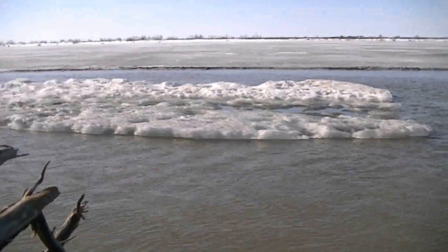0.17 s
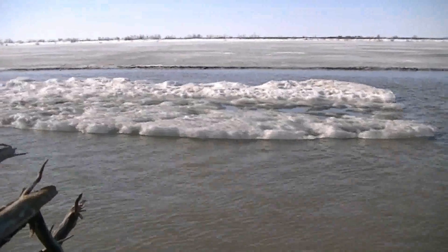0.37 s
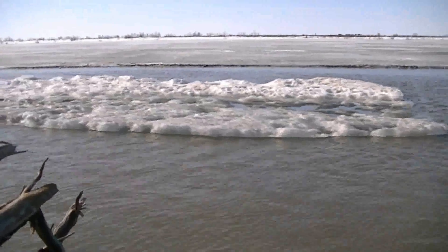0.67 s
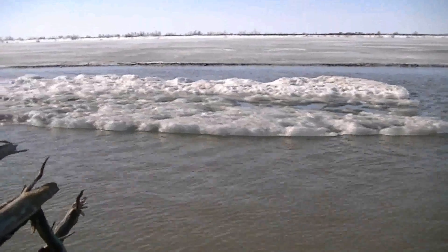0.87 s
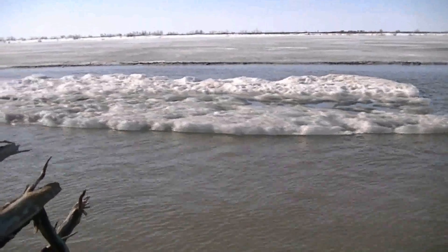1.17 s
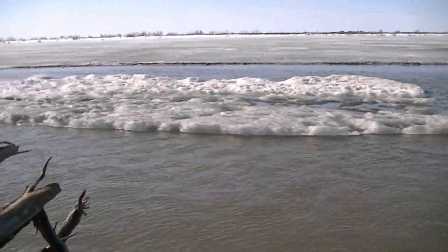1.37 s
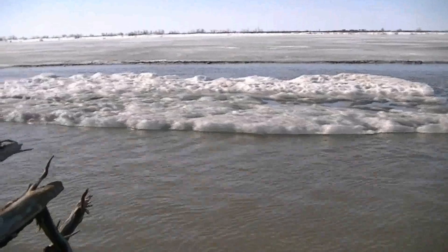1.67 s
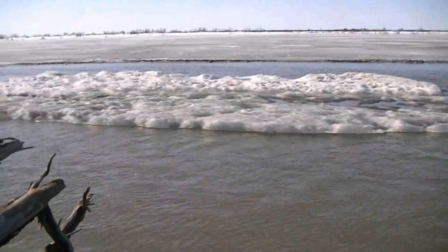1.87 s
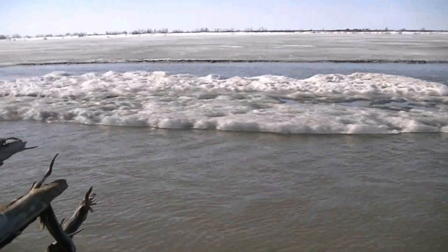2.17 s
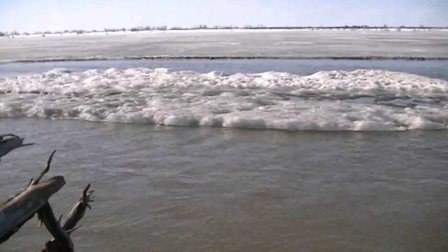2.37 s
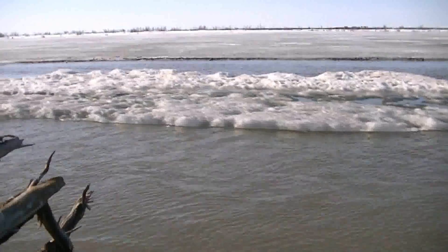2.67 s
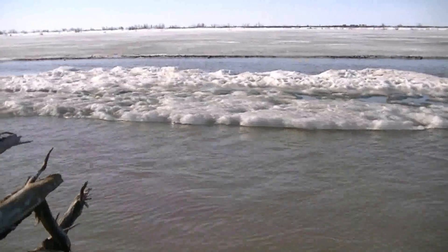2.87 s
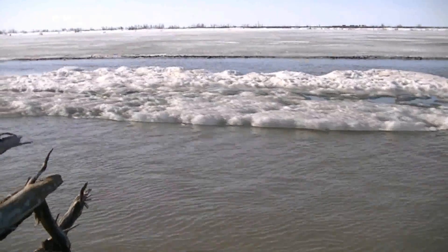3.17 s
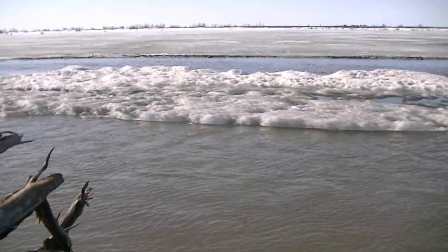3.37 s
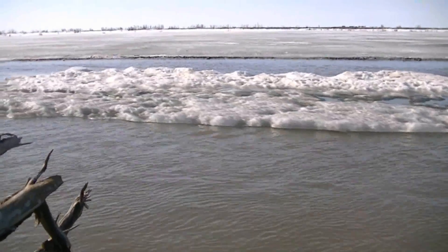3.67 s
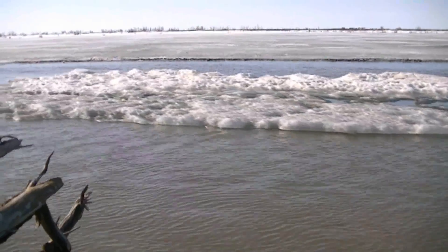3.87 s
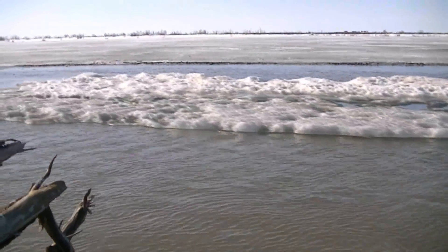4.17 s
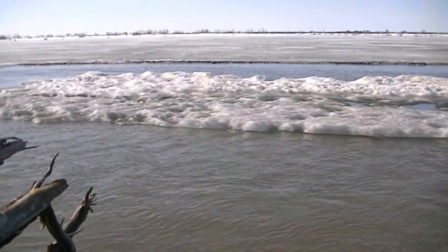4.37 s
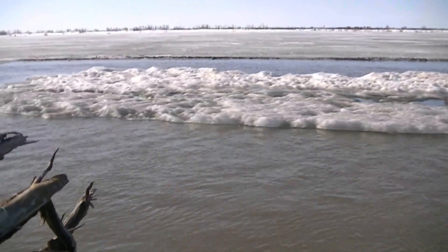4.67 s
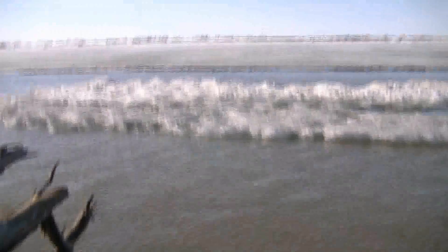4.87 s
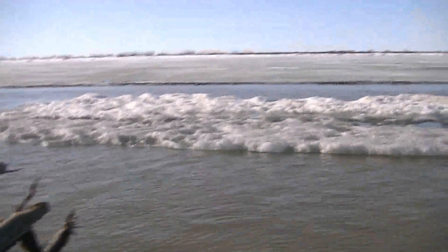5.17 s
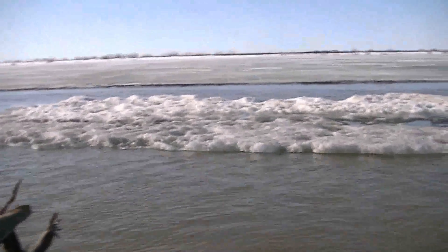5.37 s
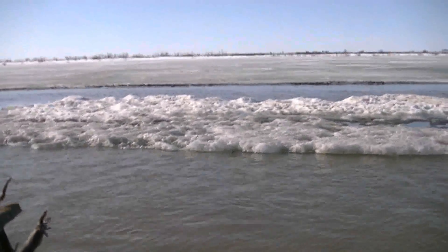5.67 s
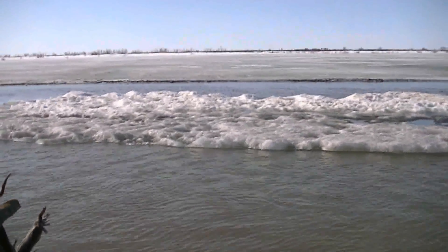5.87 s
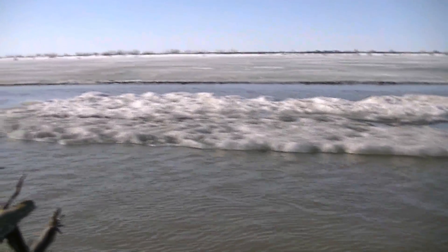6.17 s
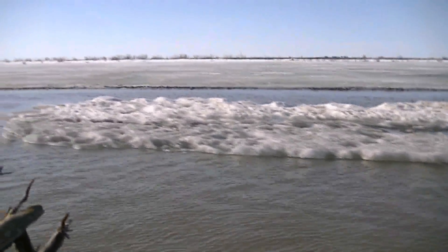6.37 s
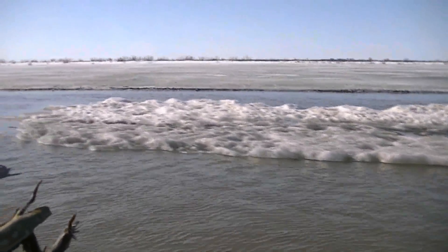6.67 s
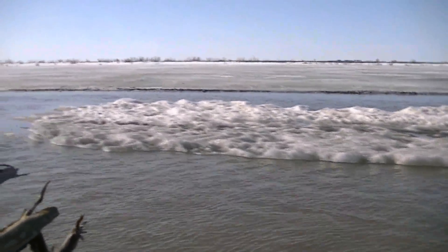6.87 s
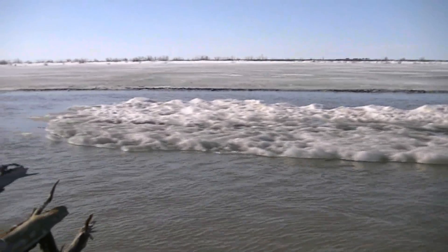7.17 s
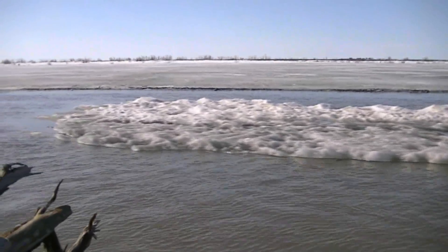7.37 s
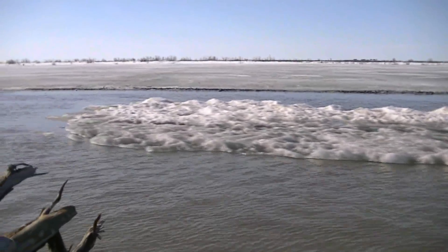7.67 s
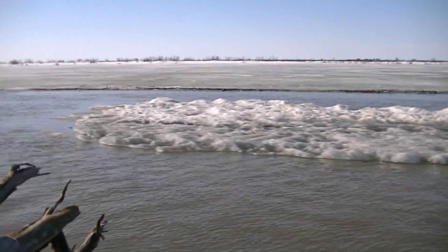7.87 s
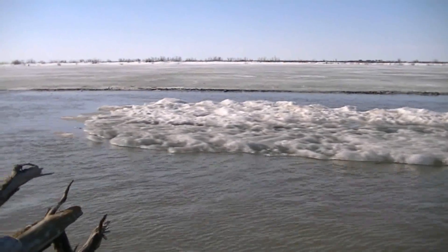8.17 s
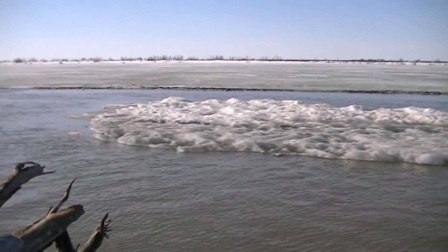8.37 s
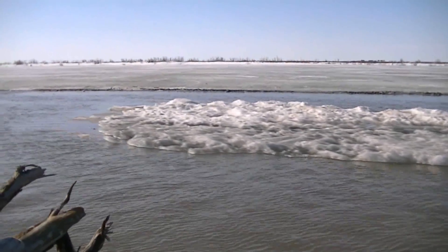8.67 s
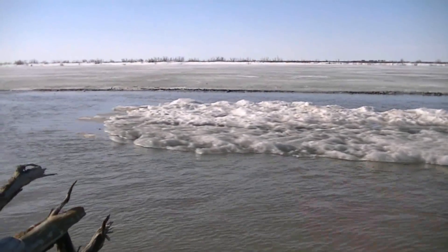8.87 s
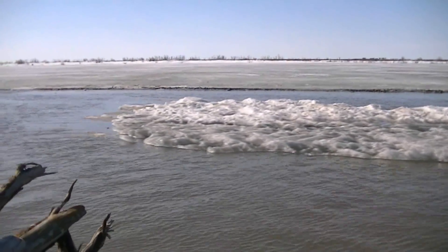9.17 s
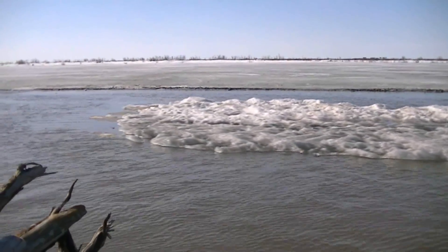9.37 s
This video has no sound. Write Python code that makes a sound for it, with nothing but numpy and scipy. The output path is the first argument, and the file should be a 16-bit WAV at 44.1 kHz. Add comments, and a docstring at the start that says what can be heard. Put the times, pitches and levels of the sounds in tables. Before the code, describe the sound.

Melting ice drifting on a river, heard close from the bank outdoors. Irregular dry cracks, needle-like ticks and short hollow pops come in clusters, densest between about two and six seconds, then thin out. Beneath them are tiny bubbling trickles, drips and a faint patchy hiss. Brief low wind flutters hit the stereo microphone, mostly on the right; a far bird honks faintly.

```python
"""Rotten, melting river ice, heard from the bank: cracks with short rings, dry needle snaps and drips.
Ripples under the ice drive a trickle of small pops, a needle crackle and a soft, patchy hiss.
Gusts flutter mostly on the right microphone port, as shaped noise and single eddy pulses.
A distant two-harmonic bird honk, faint sine peeps and a thin trill of narrow-band noise lie behind."""
import sys
import numpy as np
from scipy import signal
from scipy.fft import rfft, irfft
from scipy.io import wavfile
from scipy.ndimage import uniform_filter1d

SR = 44100
rng = np.random.default_rng(int(sys.argv[2]) if len(sys.argv) > 2 else 0)


def store_wav(level_fs):
    """Save 16-bit WAV to argv[1]."""
    pcm = np.round(np.clip(np.atleast_2d(level_fs), -1, 1) * 32767)
    wavfile.write(sys.argv[1], SR, pcm.T.astype(np.int16))


N = 420273

# ice breaks: (time [s], ring level [dB], pitch [Hz], 1/e decay [cycles], relative crack level [dB])
ICE_BREAKS = [(.0766, -44, 2020, 2.2, -45), (0.09, -37, 1690, 1.8, -40.5), (0.116, -33.5, 1790, 2.2, -37),
              (0.169, -41, 1510, 2.4, -44), (0.1767, -28, 1610, 0.86, -39), (.209, -28.5, 1930, 1.8, -36),
              (0.3437, -24, 4520, 1.2, -31), (0.466, -27, 1690, 6.7, -33), (0.637, -35.5, 1670, 3.6, -42),
              (0.768, -39.5, 1670, 6.2, -63), (0.831, -24.5, 4770, 0.61, -69),
              (1.0575, -38, 4850, 2.1, -35), (1.0825, -33.5, 1730, 3.6, -49),
              (1.391, -22.5, 1510, 1.2, -50), (1.3973, -40, 1280, 1.54, -40.5),
              (1.4951, -32, 1520, 0.34, -44), (1.727, -32, 1480, 0.46, -47),
              (1.853, -29, 1890, 1.15, -36.5), (1.971, -35.5, 1820, 5.7, -64),
              (1.9907, -30, 1630, 0.49, -39), (2.046, -38.5, 1700, 3.5, -47),
              (2.0577, -39.5, 650, 1.5, -42), (2.124, -35.5, 1420, 9.4, -62), (2.1377, -31, 1740, 1.9, -43),
              (2.169, -36, 3290, 1.9, -38), (2.2698, -38, 4600, 3.6, -47), (2.3155, -28, 610, 0.48, -40),
              (2.346, -33, 1740, .9, -37.5), (2.4041, -26, 5800, 0.62, -36.5),
              (2.4222, -35.5, 1770, 7.2, -36), (2.4348, -22, 1080, 0.48, -33),
              (2.4491, -29.5, 4800, 2.8, -32), (2.4756, -19.5, 816, 2.2, -44),
              (2.4869, -19.5, 1090, 0.46, -44), (2.525, -31.5, 1680, 1.5, -45),
              (2.562, -28, 857, 0.33, -58), (2.865, -26.5, 1260, 0.46, -33.5),
              (2.8819, -37.5, 668, 2.1, -43), (2.938, -36.5, 652, 5.2, -44),
              (2.9893, -28.5, 1724, 6.2, -37), (3.013, -21, 1510, 1.8, -28.5), (3.015, -25, 824, 1.4, -43),
              (3.039, -23, 2350, 1.3, -39), (3.0453, -30, 1120, 2.9, -50), (3.0458, -28, 4040, 5.4, -38),
              (3.059, -30, 3050, 3.5, -38), (3.073, -34.5, 4240, 5.4, -48), (3.096, -26.5, 4580, 0.46, -39),
              (3.1241, -25.5, 2180, 0.75, -44), (3.3493, -27.5, 1650, 0.74, -52),
              (3.5489, -24.5, 2890, 1.2, -35.5), (3.5788, -29, 778, 2.9, -37), (3.597, -38, 2260, 1.2, -29),
              (3.6048, -40, 2290, 1.3, -35), (3.6152, -34, 4160, 5.2, -49), (3.68, -37, 1800, 2.5, -33.5),
              (4.075, -35, 2120, 5.9, -39), (4.0978, -32, 2720, 11, -29.5), (4.114, -35, 1020, 1.3, -43),
              (4.121, -38, 1550, 2.6, -33), (4.1382, -36, 1490, 4.4, -42), (4.1584, -37, 1505, 2.7, -35.5),
              (4.2117, -31, 1810, 4.2, -41), (4.2538, -33, 4400, 3.3, -41), (4.369, -31, 1150, 0.64, -61),
              (4.419, -30, 1680, 0.72, -55), (4.4441, -24.5, 1230, 0.15, -49),
              (4.616, -31.5, 1440, 8.1, -37), (4.626, -20, 1950, 2.6, -58), (4.707, -31.5, 1340, 1.5, -57),
              (4.7277, -33, 1357, 1, -47), (4.7957, -35, 2660, 1.1, -41.5), (4.885, -34, 1230, 0.28, -40.5),
              (4.954, -38, 1710, 2.6, -43), (4.9846, -37.5, 2940, 4.4, -56), (5.144, -26.5, 1880, 1, -35.5),
              (5.164, -26, 2210, 0.41, -39), (5.204, -26.5, 1660, 5.1, -40.5),
              (5.253, -29.5, 2670, 1.6, -38), (5.257, -33, 1490, 0.92, -35), (5.272, -34.5, 3980, 4, -35),
              (5.283, -33, 2420, 1.6, -37), (5.2912, -36, 1700, 1.8, -39), (5.296, -33.5, 1560, 1.5, -48),
              (5.3929, -36, 840, 2.5, -37), (5.6718, -38, 1950, 2, -39), (5.688, -33, 1740, 2.2, -35),
              (5.7332, -30.5, 1750, 1.3, -36), (5.743, -28.5, 1390, 0.84, -38), (5.7957, -34, 1690, 7, -37),
              (5.819, -43, 1194, 3.4, -37.5), (5.9374, -38, 2030, 1.1, -30.5),
              (5.9742, -37, 4530, 3.1, -37), (6.008, -35.5, 1440, 4.6, -42), (6.021, -33, 1860, 4.3, -35.5),
              (6.0327, -35, 4680, 3.4, -40), (6.2354, -25, 1350, 1.2, -47), (6.2765, -42.5, 727, 5, -34),
              (6.3206, -42, 2300, 4.5, -38.5), (6.3674, -41, 1550, 2.5, -44),
              (6.762, -38, 2340, 3.5, -38.5), (7.0217, -35, 1470, 2.3, -38.5),
              (7.1438, -37, 1570, 2.5, -40.5), (7.243, -31.5, 3370, 0.51, -53),
              (7.2978, -31, 2110, 13.5, -36.5), (7.339, -36.5, 2150, 6.5, -56),
              (7.5964, -31.5, 1540, 2.8, -40), (7.712, -45, 7900, 24, -61), (7.737, -43, 6940, 14.3, -66),
              (7.7432, -30, 2230, 7.1, -56), (7.7701, -27, 840, 4.4, -37.5), (7.7752, -28, 990, 1.6, -48),
              (7.835, -30, 1570, 0.31, -43), (7.968, -38.5, 6370, 9.1, -61), (7.976, -29.5, 1910, 1.7, -41),
              (8.2074, -30.5, 2010, 0.73, -47), (8.24, -35.5, 2210, 6, -58),
              (8.2769, -29.5, 950, 4.2, -42.5), (8.2771, -24, 1570, 2.8, -41),
              (8.2834, -24.5, 1550, 3.6, -52), (8.3386, -30, 1950, 7.2, -64), (8.8653, -37, 1140, 2, -42),
              (8.88, -33, 1230, 0.89, -60), (8.9123, -25.5, 1650, 1.8, -50), (8.993, -35.5, 2418, 2.1, -67),
              (9.155, -31.5, 4900, 0.82, -47)]
# dry snaps of ice needles: (time [s], level [dB], pitch [Hz])
NEEDLE_SNAPS = [(.0898, -21.5, 3940), (0.3637, -23, 3900), (.3996, -26, 3800), (.5086, -25.5, 3810),
                (0.6257, -22, 3130), (.632, -23.5, 5700), (2.513, -27, 8900), (2.6327, -29, 4270),
                (3.2064, -31, 3430), (3.3161, -30, 9470), (3.769, -30.5, 8320), (4.0413, -26, 3780),
                (4.1707, -28, 8300), (4.1899, -20.5, 3180), (5.3868, -27, 3210), (5.5593, -26.5, 4000),
                (5.697, -22, 4130), (6.0527, -27, 4150), (6.4102, -29.5, 7800), (6.6683, -26.5, 3630),
                (6.9478, -26.5, 4840), (7.0155, -28, 8950), (7.0617, -26, 5620), (7.0885, -32, 5000),
                (8.6065, -25, 5340), (8.7263, -26, 3100), (8.744, -30.5, 8450)]
# crack spectrum: (frequency [Hz], relative level [dB])
CRACK_SPECTRUM = [(150, -59), (500, -54), (1200, 10), (2500, 7), (4500, 3.5), (7000, 1), (10000, 0),
                  (12000, -17.5)]
# meltwater drips into the river, no crack: (time [s], level [dB], pitch [Hz])
MELT_DRIPS = [(.0456, -39.5, 1000), (.5293, -39, 1583), (.7578, -39, 1800), (1.2086, -40.5, 1540),
              (2.0308, -42.5, 635), (2.808, -38, 1270), (3.3608, -29, 2060), (3.4819, -41, 730),
              (3.4902, -35.5, 2800), (3.5168, -40, 1098), (4.2895, -40.5, 895), (4.3523, -37.5, 1500),
              (4.5145, -37.5, 1320), (5.0022, -34, 1152), (5.4418, -41.5, 910), (5.5169, -45, 650),
              (6.0939, -37.5, 1593), (6.197, -37.5, 1490), (6.2505, -39.5, 620), (6.6605, -39, 2140),
              (7.2182, -44, 855), (7.7332, -31.5, 960), (7.7502, -29, 854), (8.0628, -39, 1580),
              (8.1809, -39, 1410), (8.3247, -31, 2160), (8.4088, -39.5, 740), (8.4444, -35, 2210),
              (8.569, -38.5, 765), (8.6342, -41.5, 1470), (8.7986, -38, 2180), (9.0795, -39.5, 1528),
              (9.092, -39, 2750), (9.4148, -44.5, 740)]
# small pops by pitch: (pitch [Hz], relative level [dB])
SMALL_POP_SPECTRUM = [(550, -3.5), (800, 1), (1150, -1), (1650, 6), (2200, -0.5), (3200, -6), (4400, -15),
                      (6500, -24), (9500, -3)]
# ripples under the ice: (crest time [s], relative level [dB], ebb to 1/e [s])
RIPPLE_CRESTS = [(.12, -53, 0.1), (.4, -55, .1), (1.07, -60, .08), (1.88, -53, .16), (2.132, -48.5, .05),
                 (2.45, -43.5, .11), (2.861, -52, 0.084), (3.03, -43, .07), (3.35, -45, 0.054),
                 (3.58, -45.5, .05), (3.8, -48, .06), (4.12, -48.5, .12), (4.4, -48, .07), (4.63, -49, .1),
                 (4.969, -48.5, 0.1), (5.27, -46, .07), (5.701, -46.5, .09), (6.009, -50, 0.047),
                 (6.242, -51.5, 0.15), (6.83, -54, 0.13), (7.319, -49.5, 0.08), (7.76, -48, .07),
                 (8.28, -50.5, 0.061), (8.451, -54.5, 0.1), (8.95, -60, 0.15)]
CALM_REL_DB = -62  # current between ripples, on the scale of the ripple levels
RISE_PER_EBB = 0.9  # ripple rise time as a share of its ebb
# wash spectrum: (frequency [Hz], relative level [dB per Hz])
WASH_SPECTRUM = [(100, -23.5), (190, -18), (280, -8), (400, -7), (700, 0), (1100, -3), (1650, -2),
                 (2300, -5.5), (3500, -9), (5000, -11), (7000, -17), (10000, -23), (12000, -40.5)]
# likeness of the two ports for the wash: (frequency [Hz], coherence [0-1])
WASH_COHERENCE = [(150, 0.83), (500, 0.87), (1000, 0.74), (1500, 0.97), (2800, 0.87), (4000, 1)]
# gusts at the microphone: (start [s], length [s], relative level [dB])
WIND_GUSTS = [(1.556, 0.028, -45.5), (1.605, 0.046, -35.5), (1.684, 0.056, -42), (1.787, 0.052, -37),
              (1.9, 0.03, -37.5), (2.114, 0.059, -54), (2.305, 0.037, -40.5), (2.46, 0.033, -38),
              (2.553, 0.053, -42.5), (2.677, 0.17, -54), (3.385, 0.067, -49.5), (3.751, 0.0084, -42.5),
              (3.884, 0.044, -48), (4.028, 0.015, -43.5), (4.123, 0.068, -46.5), (4.238, 0.025, -40),
              (4.303, 0.015, -40.5), (4.545, 0.02, -35.5), (4.585, 0.071, -36), (4.698, 0.11, -47.5),
              (4.893, 0.15, -46.5), (6.184, 0.029, -46), (6.522, 0.016, -50.5), (6.718, 0.033, -52),
              (6.812, 0.012, -38.5), (7.45, 0.11, -52.5), (8.388, 0.28, -59), (9.216, 0.029, -53.5),
              (9.464, 0.085, -45.5)]
GUST_RISE_S, GUST_FALL_S = 0.015, 0.014  # 1/e time constants
BREEZE_REL_DB = -84  # on the scale of the gust levels
# single eddies at the port: (time [s], right-port level [dB], pitch [Hz])
EDDIES = [(1.641, -30, 667), (1.696, -25.5, 416), (1.739, -26.5, 345), (1.797, -20, 495),
          (1.808, -20.5, 500), (1.939, -26.5, 700), (1.955, -25.5, 403), (2.464, -20.5, 525),
          (3.758, -33, 487), (4.2357, -14.5, 720), (4.249, -24.5, 413), (4.558, -20.5, 620),
          (4.574, -27, 375), (4.631, -25, 495), (4.973, -28.5, 341), (6.076, -39.5, 340), (6.12, -38, 325),
          (6.195, -29.5, 626), (6.604, -37.5, 386), (6.701, -34.5, 314), (6.708, -34.5, 537),
          (6.925, -34.5, 420), (8.122, -33, 346), (8.261, -35.5, 340)]
# wind flutter spectrum: (frequency [Hz], relative level [dB per Hz])
WIND_SPECTRUM = [(30, -42), (90, -26.5), (170, -8.5), (320, 0.5), (550, -6), (800, -9), (1200, -21),
                 (2200, -38), (4000, -71)]
# bird calls: (top of arch [s], level [dB], pitch at top [Hz])
BIRD_CALLS = [(3.808, -54.5, 780), (4.413, -42, 804), (4.697, -45.5, 804), (6.838, -50, 765)]
# far peeps, perhaps other birds: (middle [s], length [s], level [dB], pitch [Hz])
FAR_PEEPS = [(6.464, .07, -56, 968), (8.965, 0.11, -52.5, 960), (9.027, .035, -54.5, 1690)]
# far trill, perhaps frogs: (start [s], length [s], level [dB])
FAR_TRILLS = [(3.401, 1.25, -63.5), (5.799, 1.86, -62.5)]
TRILL_HZ, TRILL_WIDTH_HZ, TRILL_FADE_S = 2890, 240, 0.34
EDGE_HZ = 12050  # upper band limit


def gain_of(db):
    """Decibels to gain."""
    return 10 ** (np.asarray(db) / 20)


def evened(x):
    """Scales to rms 1."""
    return x / np.sqrt(np.mean(x ** 2) + 1e-20)


def read(points, hz):
    """Interpolates a spectrum on a log-frequency axis."""
    f, value = np.transpose(points)
    return np.interp(np.log(hz + 1), np.log(f), value)


def coloured(x, points):
    """Minimum-phase filter by a spectrum: no ringing ahead of a click."""
    fft_hz = abs(np.fft.fftfreq(2048, 1 / SR))
    log_gain = np.log(gain_of(read(points, fft_hz)))
    taps = np.fft.ifft(np.exp(np.conj(signal.hilbert(log_gain)))).real
    return signal.oaconvolve(x, taps / np.linalg.norm(taps))[:len(x)]


def wander(hz):
    """Smooth noise of rms 1 with a Gaussian roll-off at the given rate."""
    rolloff = np.exp(-(np.fft.rfftfreq(N, 1 / SR) / hz) ** 2)
    return evened(irfft(rfft(rng.standard_normal(N)) * rolloff, N))


def add(mix, s, sound):
    """Adds a sound into the mix at a time."""
    part = mix[..., max(round(s * SR), 0):][..., :sound.shape[-1]]
    part += sound[..., :part.shape[-1]]


def placed(x, right_db):
    """Two ports that differ only in level."""
    return x * gain_of([[-right_db / 2], [right_db / 2]])


def sparks(per_s, spread_db):
    """A random train of clicks at a given rate, mostly small, a few large."""
    at = np.flatnonzero(rng.random(N) < per_s / SR)
    train = np.zeros(N)
    sizes = gain_of(spread_db * np.minimum(rng.exponential(1, len(at)), 2.6))
    train[at] = rng.choice([-1, 1], len(at)) * sizes
    return train


def pops(crack_db=14, crack_s=0.0051, upper_db=-12, upper_cycles=4.4, chip_db=-10, chip_s=0.007,
         chip_cycles=3.8, chip_spread=1.404, right_db=-0.6, chip_count=3):
    """Each break is a crack, a short ring with a weaker upper mode, and a few chips shaken loose around it."""
    out = np.zeros((2, N))
    for s, db, hz, cycles, snap_db in ICE_BREAKS:
        main = gain_of(db) * ring(hz, cycles)
        add(out, s, placed(main, right_db))
        upper = gain_of(db + upper_db) * ring(hz * rng.uniform(1.106, 1.823), upper_cycles)
        add(out, s, placed(upper, right_db))
        add(out, s, gain_of(snap_db + crack_db) * snap(crack_s, crystal_hz()))
        for late, pitch, size in rng.standard_normal((chip_count, 3)):
            chip = ring(np.clip(hz * chip_spread ** pitch, 1100, 7000), chip_cycles)
            chip_level_db = (db + snap_db) / 2 + chip_db + 2 * np.clip(size, -2, 1)
            add(out, s + chip_s * (late + 0.6), placed(gain_of(chip_level_db) * chip, right_db))
    return out


def ring(hz, cycles, swell_cycles=0.88, glide=0.00063):
    """A pocket of air or a crystal rings for a few cycles, rising slightly in pitch."""
    turns = np.arange(int(7 * cycles / hz * SR) + 8) / SR * hz
    shape = (1 - np.exp(-turns / swell_cycles)) * np.exp(-turns / cycles)
    phase_turns = turns * (1 + glide * turns / cycles) + rng.random()
    return shape / shape.max() * np.sin(2 * np.pi * phase_turns)


def snap(decay_s, own_hz, hump_db=13, octaves=0.28, steps_per_s=3000):
    """A crack jumps through one crystal in sharp steps: unit energy, coloured by that crystal's pitch."""
    t = np.arange(SR // 60) / SR
    hz = np.geomspace(CRACK_SPECTRUM[0][0], CRACK_SPECTRUM[-1][0], num=40)
    hump = hump_db * np.exp(-(np.log2(hz / own_hz) / octaves) ** 2)
    colour = read(CRACK_SPECTRUM, hz) + hump
    steps = rng.standard_normal(len(t)) * (rng.random(len(t)) < steps_per_s / SR)
    steps[0] = 1
    burst = coloured(steps * np.exp(-t / decay_s), np.c_[hz, colour])
    return burst / np.linalg.norm(burst)


def crystal_hz(low_hz=1700, high_hz=6000):
    """The pitch of a crystal of random size."""
    return low_hz * (high_hz / low_hz) ** rng.random()


def needles(decay_s=0.0025, hump_db=15):
    """Single ice needles snap dry, with no ring."""
    out = np.zeros(N)
    for s, db, hz in NEEDLE_SNAPS:
        add(out, s, gain_of(db) * snap(decay_s, hz, hump_db))
    return out


def drips(cycles=2.45, glide=0.005):
    """Each drip traps a bubble that rings briefly."""
    out = np.zeros(N)
    for s, db, hz in MELT_DRIPS:
        add(out, s, gain_of(db) * ring(hz, cycles, glide=glide))
    return out


def lapping():
    """Each ripple swells and ebbs on top of the calm current; rms 1."""
    t = np.arange(N) / SR
    lap = gain_of(CALM_REL_DB) * np.ones(N)
    for s, db, ebb_s in RIPPLE_CRESTS:
        width_s = np.where(t < s, RISE_PER_EBB * ebb_s, ebb_s)
        lap += gain_of(db) * np.exp(-((t - s) / width_s) ** 2)
    return evened(lap)


def trickle(lap, level_db=-56.5, per_s=380, spread_db=3.5, follows=0.28, count=80):
    """Small pops and bubbles, more and louder as a ripple runs under the ice; long rings rare and faint."""
    out = np.zeros(N)
    for hz in np.geomspace(SMALL_POP_SPECTRUM[0][0], SMALL_POP_SPECTRUM[-1][0], count):
        cycles = 0.8 + 1.1 * min(rng.exponential(), 4)
        grain = gain_of(read(SMALL_POP_SPECTRUM, hz)) * ring(hz, cycles, glide=0.019) / np.sqrt(cycles)
        clicks = sparks(per_s * np.sqrt(lap) / count, spread_db)
        out += signal.oaconvolve(clicks, grain)[:N]
    return gain_of(level_db) * evened(out * lap ** follows)


def crackle(lap, level_db=-61.5, per_s=120, spread_db=3.5, clump_db=6, decay_s=0.0018, follows=0.053, count=32):
    """Thin ice needles snap in little clusters, each with a pitch of its own."""
    rate = per_s * lap * gain_of(clump_db * wander(hz=18)) / count
    out = np.zeros(N)
    for _ in range(count):
        needle = snap(decay_s, crystal_hz(), hump_db=16.5)
        out += signal.oaconvolve(sparks(rate, spread_db), needle)[:N]
    return gain_of(level_db) * evened(out * lap ** follows)


def wash(lap, level_db=-58.5, follows=0.082, patchy_db=3.0):
    """The far water and ice merge into a patchy hiss, partly alike at the two ports."""
    hz, _, (left, other) = signal.stft(rng.standard_normal((2, N)), SR, nperseg=1024)
    same = np.clip(read(WASH_COHERENCE, hz), 0, 1)[:, None]
    right = same * left + np.sqrt(1 - same ** 2) * other
    patches = uniform_filter1d(rng.standard_normal(left.shape), size=5, axis=0)  # over frequency
    patches = evened(uniform_filter1d(patches, size=7, axis=1))  # over time
    bins = np.array([left, right]) * gain_of(read(WASH_SPECTRUM, hz)[:, None] + patchy_db * patches)
    hiss = signal.istft(bins, SR, nperseg=1024)[1][:, :N]
    return gain_of(level_db) * evened(hiss * lap ** follows)


def wind(right_db=-2, left_db=-16, blur=0.15, eddies_per_s=450, sharp_db=-2, eddy_cycles=0.82):
    """Eddies thump the windward right port; the left one is sheltered."""
    gust = gusting()
    out = np.zeros((2, N))
    for port, db in enumerate((left_db, right_db)):
        thumps = evened(sparks(eddies_per_s, spread_db=3.5)) + blur * rng.standard_normal(N)
        flutter = evened(coloured(thumps, WIND_SPECTRUM))
        # faster air gives the eddies steeper edges
        edges = gain_of(sharp_db) * np.sqrt(gust / gust.max()) * evened(np.gradient(flutter))
        out[port] = gain_of(db) * gust * (flutter + edges)
    t = np.arange(-SR // 100, SR // 100) / SR
    for s, db, hz in EDDIES:
        eddy = np.exp(-abs(t * hz / eddy_cycles) ** 1.63) * np.cos(2 * np.pi * hz * t + 1)
        add(out, s + t[0], gain_of(db) * eddy * gain_of([[left_db - right_db], [0]]))
    return out


def gusting(unsteady_db=2.2, wake_db=-14, wake_s=0.018, lead_s=0.0058):
    """Each gust rises, holds unsteadily and drops to a light breeze; a single eddy stirs the air around it."""
    t = np.arange(N) / SR
    gust = gain_of(BREEZE_REL_DB) * np.ones(N)
    for s, length_s, db in WIND_GUSTS:
        outside = np.maximum((s - t) / GUST_RISE_S, (t - s - length_s) / GUST_FALL_S)
        gust += gain_of(db) * np.exp(-np.clip(outside, 0, 20))
    for s, db, _ in EDDIES:
        away = np.maximum((t - s) / wake_s, (s - t) / lead_s)
        gust = np.maximum(gust, gain_of(db + wake_db) * np.exp(-np.minimum(away, 20)))
    return gust * gain_of(unsteady_db * wander(hz=44.4))


def bird(half_s=0.054, droop=0.205, first_db=-9, jitter=0.0097, rough=0.15):
    """A short, slightly hoarse, arched honk, strongest in its second harmonic."""
    out = np.zeros(N)
    u = np.linspace(-1, 1, int(2 * half_s * SR))  # -1 to 1 across the call
    for s, db, hz in BIRD_CALLS:
        pitch_hz = hz * (1 - droop * u ** 2 + jitter * wander(hz=150)[:len(u)])
        phase = 2 * np.pi * np.cumsum(pitch_hz) / SR
        voice = gain_of(first_db) * np.sin(phase) + np.sin(2 * phase)
        voice *= 1 + rough * wander(hz=200)[:len(u)]
        add(out, s - half_s, gain_of(db) * voice * np.cos(u * np.pi / 2) ** 2)
    return out


def peeps():
    """Thin steady sine notes that swell and fade softly."""
    out = np.zeros(N)
    for s, length_s, db, hz in FAR_PEEPS:
        t = np.arange(0, length_s, 1 / SR)
        swell = np.sin(np.pi * t / length_s) ** 2
        add(out, s - length_s / 2, gain_of(db) * swell * np.sin(2 * np.pi * hz * t))
    return out


def trill(uneven_db=4.5):
    """A narrow noise band fades in and out unevenly, independent at the two ports."""
    t, hz = np.arange(N) / SR, np.fft.rfftfreq(N, 1 / SR)
    passband = np.exp(-((hz - TRILL_HZ) / TRILL_WIDTH_HZ) ** 2)
    band = evened(irfft(rfft(rng.standard_normal((2, N))) * passband, N))
    band = evened(band * gain_of(uneven_db * wander(hz=25)))
    level = np.zeros(N)
    for s, length_s, db in FAR_TRILLS:
        level += gain_of(db) * np.clip(np.minimum(t - s, s + length_s - t) / TRILL_FADE_S, 0, 1)
    return band * level


def bank(x, level_db=-11, t60_s=0.018, dull_hz=2600):
    """The bank and the driftwood scatter a faint, dull tail that differs at the two ports."""
    t = np.arange(SR // 8) / SR
    taps = rng.standard_normal((2, len(t))) * gain_of(-60 * t / t60_s) * (t > 0.001)
    taps = signal.lfilter(*signal.butter(2, dull_hz, fs=SR), taps / np.linalg.norm(taps[0]))
    return gain_of(level_db) * signal.oaconvolve(x, taps, axes=1)[:, :N]


def scene(lowest_hz=330):
    """One lapping motion drives the wash, the trickle and the crackle."""
    lap = lapping()
    small = pops() + needles() + drips() + trickle(lap) + crackle(lap) + bird() + peeps()
    # the small sources are heard with almost no bass
    small = signal.sosfilt(signal.butter(3, lowest_hz, "high", fs=SR, output="sos"), small)
    return small + bank(small) + wash(lap) + wind() + trill()


def record(dry):
    """Linear-phase low-pass: the upper band limit."""
    taps = signal.firwin(255, EDGE_HZ, window=("kaiser", 9), fs=SR)
    return signal.oaconvolve(dry, taps[None], "same")


dry = scene()
out = record(dry)
store_wav(out)
```